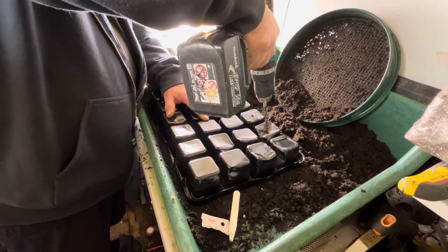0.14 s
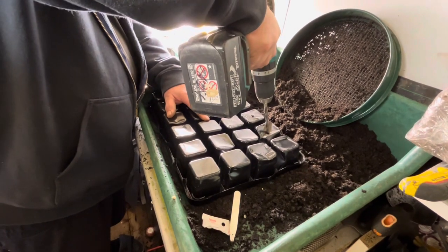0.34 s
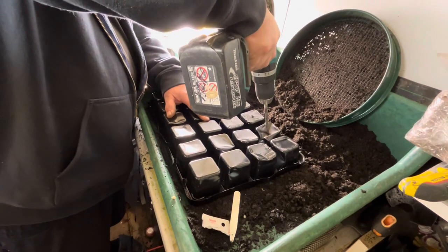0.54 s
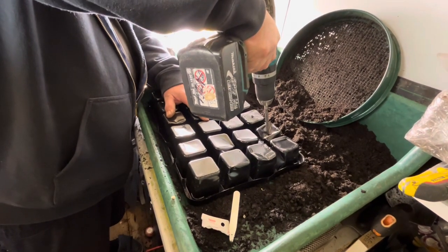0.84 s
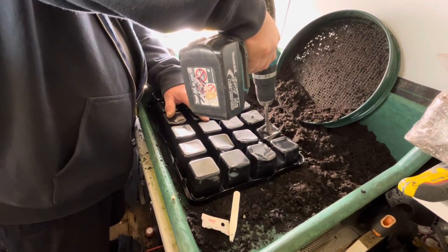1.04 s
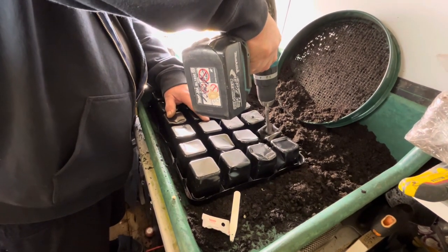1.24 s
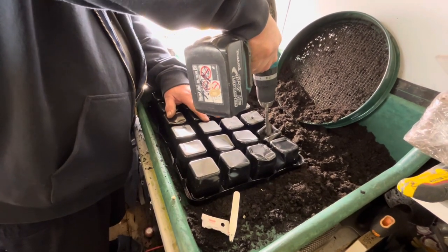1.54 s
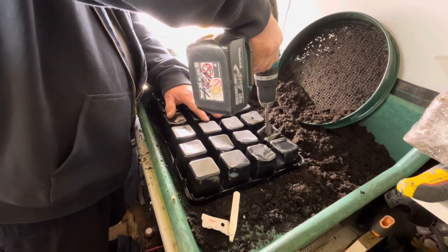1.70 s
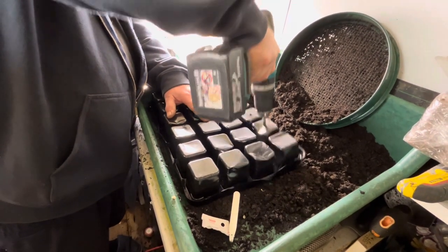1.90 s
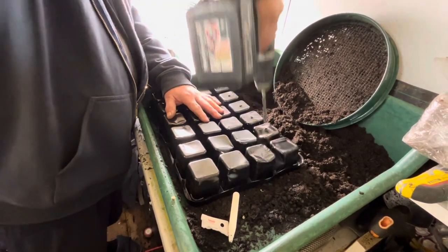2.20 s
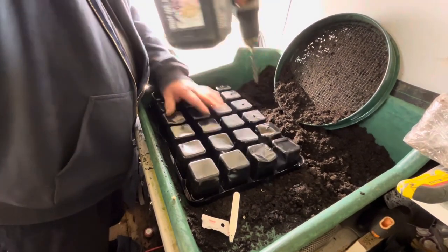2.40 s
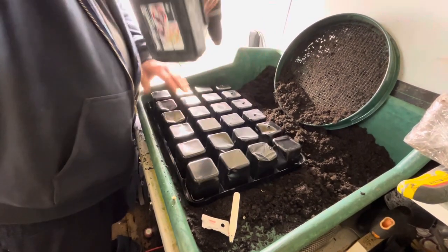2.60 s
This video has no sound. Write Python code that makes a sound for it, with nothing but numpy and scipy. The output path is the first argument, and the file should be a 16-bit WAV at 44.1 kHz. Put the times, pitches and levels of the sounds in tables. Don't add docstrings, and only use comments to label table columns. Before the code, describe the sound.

Close up in a small dry work space, a cordless drill revs and holds steady, its bit ticking on plastic, then hard clatter as it breaks through, a quick brake chirp, and the tray settling.

```python
import sys
import numpy as np
from scipy import signal
from scipy.fft import rfft, irfft
from scipy.io import wavfile
from scipy.ndimage import uniform_filter1d

SR = 44100
rng = np.random.default_rng(int(sys.argv[2]) if len(sys.argv) > 2 else 0)


def to_wav(s):
    ch = np.atleast_2d(s).T
    pcm = np.round(np.clip(ch, -1, 1) * 32767)
    wavfile.write(sys.argv[1], SR, pcm.astype(np.int16))


def invert_db(x):
    u = np.asarray(x, float) / 20
    return 10 ** u


N = 121275

# t/s, level/dB
EFFORT = [(.112, -108), (.122, -40), (.17, -38.5), (.3, -33.5), (.52, -32), (.575, -29), (1, -28),
          (1.5, -28), (2.1, -30.5), (2.125, -44.5), (2.16, -38.5), (2.195, -49), (2.23, -75), (2.3, -100)]


def evened(x):
    return x / np.sqrt(np.mean(x ** 2) + 1e-20)


def read(points, hz):
    f, value = np.transpose(points)
    return np.interp(np.log(hz + 1), np.log(f + 1), value)


def follow(rows):
    rows = np.transpose(rows)
    return [np.interp(np.arange(N) / SR, rows[0], col) for col in rows[1:]]


def drift(seconds):
    width = max(round(seconds * SR), 1)
    once = uniform_filter1d(rng.standard_normal(N), width)
    return evened(uniform_filter1d(once, width))


def colour(x, gain):
    return irfft(rfft(x) * gain(np.fft.rfftfreq(N, 1 / SR)), N)


def resonate(x, bands):
    out = np.zeros(len(x))
    for k, (hz, width, db) in enumerate(bands):
        out += (-1) ** k * invert_db(db) * signal.lfilter(*signal.iirpeak(hz, hz / width, SR), x)
    return out


def tone(hz):
    return np.sqrt(2) * np.sin(2 * np.pi * np.cumsum(hz) / SR + 6 * rng.random())


def air():
    # f/Hz, density/dB per Hz
    air_spectrum = [(25, -3), (55, 7), (101, 0.5), (558, -13), (759, -23), (1710, -21.5), (2670, -32),
                    (4300, -33.5), (16000, -17)]
    noise = rng.standard_normal(N)
    return invert_db(-57) * evened(colour(noise, lambda hz: invert_db(read(air_spectrum, hz)) / (1 + (hz / 4500) ** 2)))


def reflections(x):
    t60 = 0.083
    t = np.arange(round(t60 * SR)) / SR
    decay = rng.standard_normal(len(t)) * invert_db(-60 * t / t60)
    decay /= np.linalg.norm(decay)
    response = np.r_[np.zeros(200), signal.lfilter([.5], [1, -.8], decay)]
    return invert_db(-10) * signal.fftconvolve(x, response)[:N]


def ticks():
    # t/s, peak level/dB
    snaps = [(2.096, -19), (2.2852, -56), (2.3296, -59), (2.3436, -54), (2.372, -47.5), (2.389, -48),
             (2.425, -41), (2.5527, -65), (2.6373, -55), (2.65, -50), (2.6693, -45), (2.7, -56)]
    out, t = np.zeros(N + SR), np.arange(SR // 10) / SR
    envelope = invert_db(-60 * t / .008) + invert_db(-7.5 - 60 * t / 0.057)
    for s, db in snaps:
        out[round(s * SR):][:len(t)] += invert_db(db) * rng.standard_normal(len(t)) * envelope
    return signal.lfilter(*signal.butter(2, 4000, "high", fs=SR), out[:N])


def taps():
    # t/s, peak level/dB
    strikes = [(0.738, -48), (0.782, -45), (0.832, -42.5), (0.876, -40.5), (0.947, -43), (1.019, -35.5),
               (1.059, -41), (1.098, -45), (1.133, -34), (1.168, -40.5), (1.208, -35), (1.249, -30.5),
               (1.285, -30.5), (1.324, -31), (1.361, -29.5), (1.39, -40), (1.436, -32.5), (1.467, -26),
               (1.512, -23.5)]
    # f/Hz, level/dB, T60/s
    floor_modes = [(560, 0, .035), (670, -1, .035), (1050, -9, .03), (330, -10, .04)]
    out, t = np.zeros(N + SR), np.arange(SR // 10) / SR
    for s, db in strikes:
        ring = np.zeros(len(t))
        for hz, mode_db, t60 in floor_modes:
            detune = rng.uniform(1.0, 1.14)
            ring += invert_db(mode_db - 60 * t / t60) * np.sin(2 * np.pi * hz * detune * t)
        out[round(s * SR):][:len(t)] += invert_db(db - 1) * ring
    return out[:N]


def rings():
    SQUEAK_HZ = 13330
    # t/s, f/Hz, peak level/dB, T60/s
    free_modes = [(2.155, SQUEAK_HZ, -28, .09), (2.156, 13650, -34, .07), (2.156, 13020, -36, .06),
                  (2.12, 2200, -36, .08), (1.512, 1780, -23, .06), (2.268, 1150, -57, .2),
                  (.166, 520, -39, .12), (.875, 590, -26, .05), (.04, 266, -33.5, .046),
                  (.04, 590, -37, .038), (.122, 590, -37, .2), (.876, 1030, -25, .05),
                  (.149, 3300, -28, .036), (.148, 4300, -29, .03), (2.417, 4670, -21, .021),
                  (2.474, 875, -24, .085), (2.467, 431, -24, .09), (2.68, 145, -36, .13),
                  (1.807, 650, -7, .07), (1.807, 1014, -4, .035), (1.553, 1040, -24, .05),
                  (1.722, 1030, -22, .05), (1.758, 1050, -22, .05), (2.388, 700, -27, .06)]
    out = np.zeros(N)
    for s, hz, db, t60 in free_modes:
        t = np.maximum(np.arange(N) / SR - s, 0)
        rise = np.minimum(t * hz, 1) ** 2
        out += rise * invert_db(db - 60 * t / t60 + 2 * drift(0.00097)) * np.sin(2 * np.pi * hz * t)
    return out


def friction_slips():
    slips_per_s, spread_db = 920, 2.5
    size = invert_db(spread_db * np.minimum(rng.exponential(1, N), 4))
    return signal.lfilter([1], [1, -.99], (rng.random(N) < slips_per_s / SR) * size)


def rubbing(slips):
    # t/s, level/dB
    rub_level = [(1.4, -33), (1.75, -43), (1.82, -35.5), (1.95, -33), (1.975, -32), (2.04, -22),
                 (2.11, -29), (2.135, -44.5), (2.17, -23), (2.215, -44), (2.26, -62.5), (2.32, -58.5),
                 (2.37, -45.5), (2.45, -32), (2.54, -62), (2.62, -78), (2.66, -46.5), (2.75, -67.5)]
    # f/Hz, width/Hz, level/dB
    sheet_modes = [(345, 62, -7.5), (431, 81, -6.5), (578, 116, -3), (671, 140, -8.5), (1080, 120, -15.5),
                   (1760, 890, -22)]
    puffs = slips * rng.standard_normal(N)
    sheet = evened(resonate(puffs, sheet_modes))
    thump = evened(resonate(puffs, [(70.4, 23, -0.5), (124, 45, 3.5)]))
    mix = sheet + invert_db(-8) * thump + invert_db(-44) * evened(puffs)
    onset = np.clip((np.arange(N) / SR - rub_level[0][0]) / 0.48, 0, 1)
    return onset * invert_db(follow(rub_level)[0] + 1) * mix


def knocks():
    # t/s, peak level/dB, brightness level/dB, T60/s
    impacts = [(0.147, -26, -9, 0.18), (0.875, -25, -19, 0.048), (1.511, -16, 0.5, 0.088),
               (1.552, -19, -6, 0.1), (1.588, -13.5, -3, 0.056), (1.628, -24.5, -22, 0.28),
               (1.706, -21, -6, 0.13), (1.722, -22.5, -3, 0.1), (1.748, -17.5, -5, 0.11),
               (1.762, -20, -7, 0.067), (1.805, -0.5, -34.5, 0.038), (1.854, -13, -14, 0.34),
               (1.784, -25.5, -0.5, 0.18), (1.874, -9, -22, 0.24), (1.971, -26, -13, 0.074),
               (2.021, -16.5, -29, .06), (2.052, -21, -13.5, 0.13), (2.119, -24, -17.5, 0.033),
               (2.159, -15.5, -21, 0.11), (2.192, -28, -22.5, .05), (2.552, -47.5, -11, 0.09),
               (1.894, -11.5, -10, 0.25), (1.911, -5.5, -1, 0.026), (1.94, -12, 0, 0.048),
               (1.986, -6.5, -21, 0.15), (2.011, -7.5, -10, 0.043), (2.039, -4.5, -36.5, 0.12),
               (2.065, -13, -11.5, 0.14), (2.091, -13, -4.5, 0.058), (2.148, -16.5, -8, 0.11),
               (2.179, -13.5, -19.5, 0.031), (2.371, -44.5, -11.5, 0.11), (2.388, -22.5, -26, 0.052),
               (2.416, -13.5, -2.5, 0.049), (2.427, -15.5, -13, 0.018), (2.465, -22, -36, 0.076),
               (2.64, -32.5, -16, 0.095)]
    # f/Hz, width/Hz, level/dB
    body_modes = [(380, 120, -9), (560, 90, -5), (650, 75, 4), (1050, 110, -3), (1404, 166, -12),
                  (1750, 500, -19)]
    flex, rise_s = .03, .002
    blow_db, crack_db, tick_db = 9.5, 3, -14.5
    out, t = np.zeros(N + SR), np.arange(SR // 5) / SR
    crack_band = signal.butter(2, [1300, 5500], "bandpass", fs=SR)
    for s, db, bright_db, t60 in impacts:
        a, b = rng.standard_normal((2, len(t)))
        bend = 1 + flex * rng.uniform(-0.49, 1)
        blow = 1 + invert_db(blow_db - 60 * t / 0.011)
        push = a * blow * invert_db(-60 * t / max(t60, .02))
        modes = [(hz * bend, width, mode_db) for hz, width, mode_db in body_modes]
        body = np.minimum(t / rise_s, 1) * resonate(push, modes)
        crack = signal.lfilter(*crack_band, b * invert_db(-60 * t / t60))
        crack += np.diff(b, prepend=0) * invert_db(tick_db - 60 * t / (0.45 * t60))
        hit = body / abs(body).max() + invert_db(bright_db + crack_db) * crack
        out[round(s * SR):][:len(t)] += invert_db(db) * hit
    return out[:N]


def hiss(flicker):
    # f/Hz, density/dB per Hz
    gear_spectrum = [(100, -25), (250, -22), (600, -9.5), (1000, -5.5), (1500, -9.5), (4000, -9),
                     (8000, -13.5), (14500, -16)]
    # f/Hz, width/Hz, level/dB
    housing_modes = [(623, 36, 0.5), (2230, 44, -63), (4980, 560, 6), (4982, 52, 18.5), (6610, 153, 4),
                     (13900, 210, 3.5)]
    grit = rng.standard_normal(N) * flicker
    mix = evened(colour(grit, lambda hz: invert_db(read(gear_spectrum, hz))))
    mix = mix + invert_db(-4.0) * evened(resonate(grit, housing_modes))
    ripple = invert_db(2.5 * drift(60 / SR))[:N // 2 + 1]
    mix = colour(mix, lambda hz: ripple / (1 + (hz / 14600) ** 80))
    return invert_db(follow(EFFORT)[0] - 3) * mix


def whine():
    # t/s, f/Hz, level/dB
    switching = [(.18, 805, -99), (.203, 803, -48), (.218, 801, -31), (.258, 795, -31), (.274, 790, -48),
                 (.288, 797, -32), (.364, 811, -30), (.57, 807, -33), (.6, 810, -41), (.63, 810, -33),
                 (1.2, 805, -33), (1.45, 802, -35), (1.8, 798, -37), (2.1, 796, -38), (2.13, 796, -99)]
    # multiple, level/dB
    overtones = [(3, -21), (6, -13)]
    # t/s, f/Hz, level/dB
    slow_beat = [(.13, 345, -99), (.2, 338, -51), (.3, 294, -56.5), (.4, 281, -52), (.52, 268, -61),
                 (.58, 259, -99)]
    # t/s, f/Hz, level/dB
    slow_mesh = [(.12, 2050, -99), (.17, 2150, -46), (.33, 2600, -49), (.5, 2680, -48), (.6, 2700, -99)]
    # t/s, f/Hz, level/dB
    climbing_mesh = [(.3, 2420, -99), (.35, 2440, -48), (.48, 2430, -47), (.56, 2370, -46), (.6, 2550, -43),
                     (.65, 2680, -45), (.75, 2770, -45), (.9, 2800, -55), (1.1, 2800, -99)]
    hz, level_db = follow(switching)
    main = tone(hz * (1 + 0.0032 * drift(.02))) * invert_db(1.4 * drift(0.016))
    for multiple, db in overtones:
        main += invert_db(db) * tone(multiple * hz * (1 + .004 * drift(.01)))
    out = invert_db(level_db) * main
    for track in (slow_beat, slow_mesh, climbing_mesh):
        track_hz, track_db = follow(track)
        out += invert_db(track_db) * tone(track_hz * (1 + .008 * drift(.006)))
    return out


def shaft():
    # t/s, f/Hz
    shaft_speed = [(.12, 120), (.17, 110), (.25, 126), (.33, 113), (.42, 114), (.52, 122), (.575, 162),
                   (.62, 180), (.7, 194), (.8, 201), (1, 204), (2.1, 204), (2.16, 150), (2.23, 40)]
    multiples = [1, 5, 6, 15]
    multiple_db = [-28.5, -15.5, -22, -20]
    # t/s, level/dB
    free_gain = [(.12, 4.5), (.5, 3), (.6, 4.5), (.7, 2), (.9, 1.5), (1.2, -1.5), (1.6, -1.5), (2.2, 10)]
    speed = follow(shaft_speed)[0] * (1 + 0.0022 * drift(0.033))
    orders = sum(invert_db(db) * tone(k * speed) for k, db in zip(multiples, multiple_db))
    return invert_db(follow(EFFORT)[0] + follow(free_gain)[0]) * (speed / 204) ** 0.84 * orders


def ports(mid, other):
    # f/Hz, level/dB
    side_level = [(60, -18), (130, -7.5), (290, -10), (640, -3.5), (1410, -0.5), (3100, 0), (6820, 0),
                  (15000, -3)]
    # f/Hz, share/0-1
    tied_share = [(60, 1), (250, 0), (600, 1), (1500, 1), (5000, 0.14), (14000, 0.98)]
    # f/Hz, phase/rad
    phase_turn = [(300, 0.5), (600, 0.66), (1200, 1.52), (2500, 1.4), (5000, -0.8), (9000, 2.5),
                  (14000, 1.4)]
    hz = np.fft.rfftfreq(N, 1 / SR)
    tied = np.clip(read(tied_share, hz), 0, 1)
    coherent = tied * rfft(mid) * np.exp(1j * read(phase_turn, hz))
    own = np.sqrt(1 - tied ** 2) * rfft(other)
    side = irfft(invert_db(read(side_level, hz)) * (coherent + own), N)
    return mid + np.array([[1], [-1]]) * side


def scene():
    # t/s, level/dB
    balance = [(0, -0.5), (.35, 0), (.7, -1), (1.2, -1.5), (1.55, -2), (1.9, -2), (2.3, -2), (2.75, 0.5)]
    flicker = invert_db(drift(0.0033) + 0.46 * drift(0.014))
    slips = friction_slips()
    clean = shaft() + whine()
    struck = rings() + taps()
    views = []
    for _ in range(2):
        tray = knocks() + ticks() + rubbing(slips) + struck
        views.append(hiss(flicker) + tray + reflections(tray) + air())
    stereo = ports(views[0] + clean, views[1])
    return stereo * invert_db(np.array([[.5], [-.5]]) * follow(balance)[0])


def top_cut(x):
    return signal.sosfilt(signal.butter(12, 16440, fs=SR, output="sos"), x)


def record(dry):
    low_pass = signal.firwin(101, 15400, window=("kaiser", 3), fs=SR)
    mix = signal.oaconvolve(dry, low_pass[None], "same")
    mix = signal.lfilter(*signal.butter(2, 45, "high", fs=SR), mix)
    mix = .95 * np.tanh(mix / .95)
    return top_cut(mix)


dry = scene()
out = record(dry)
to_wav(out)
```